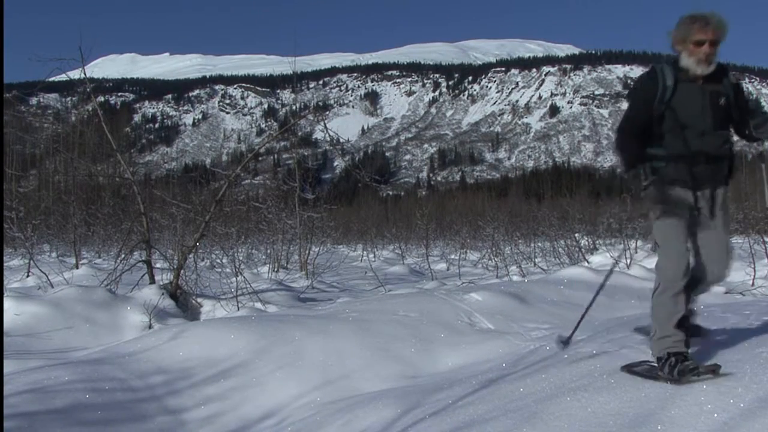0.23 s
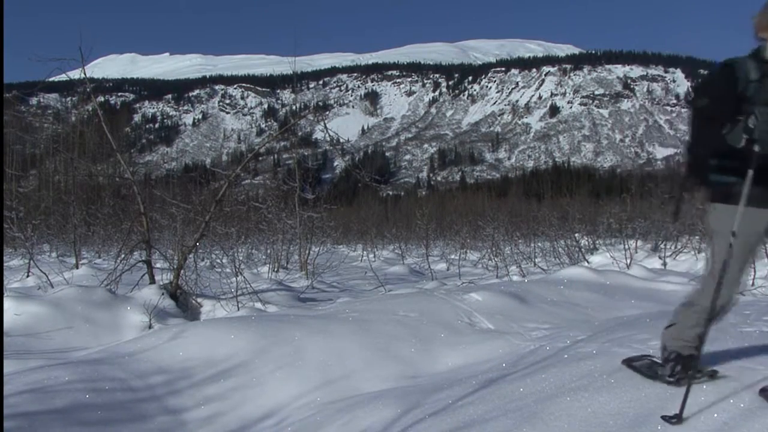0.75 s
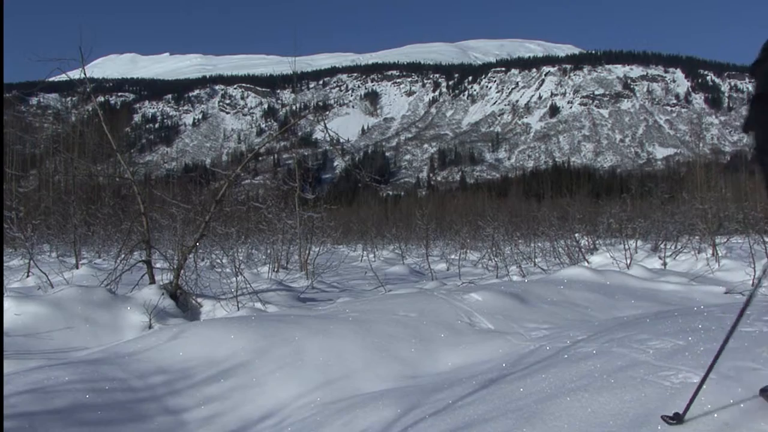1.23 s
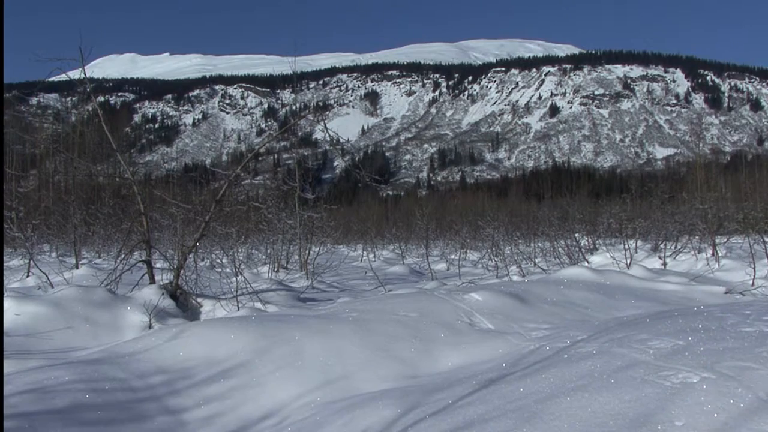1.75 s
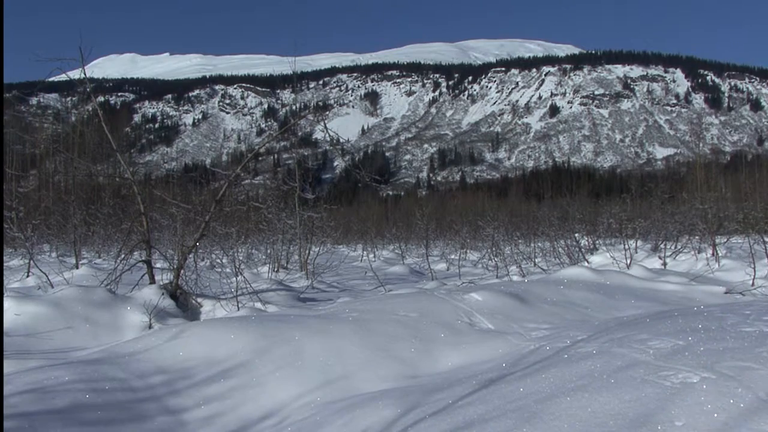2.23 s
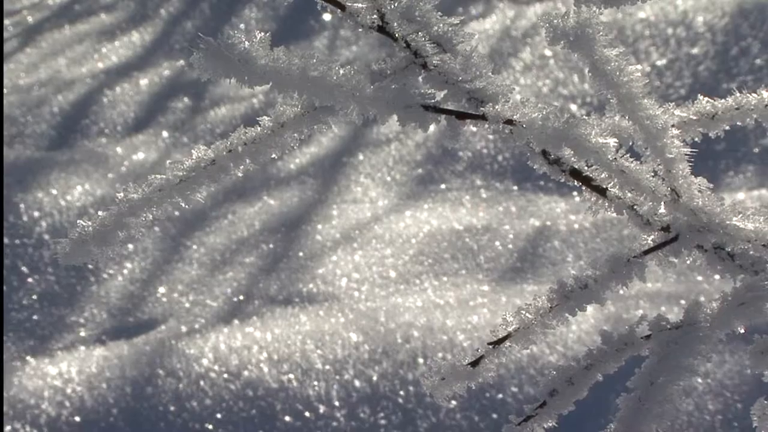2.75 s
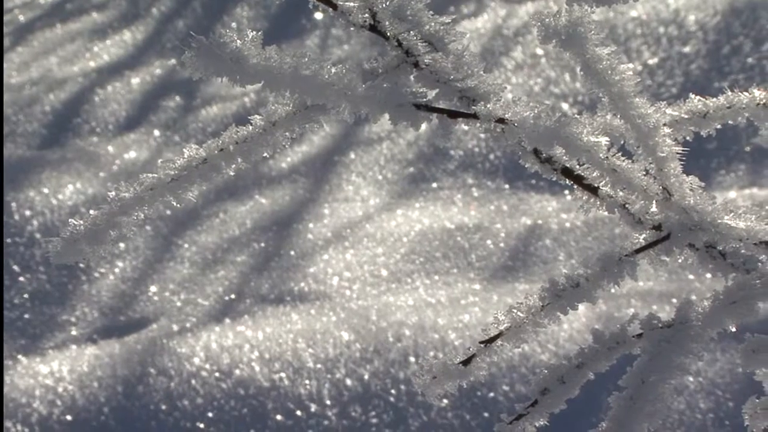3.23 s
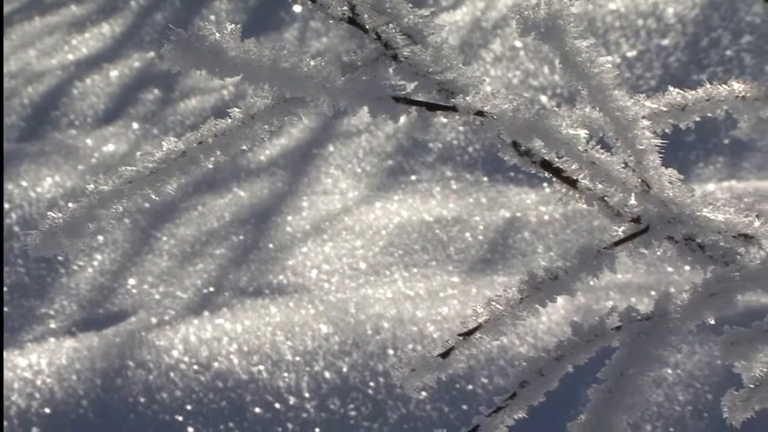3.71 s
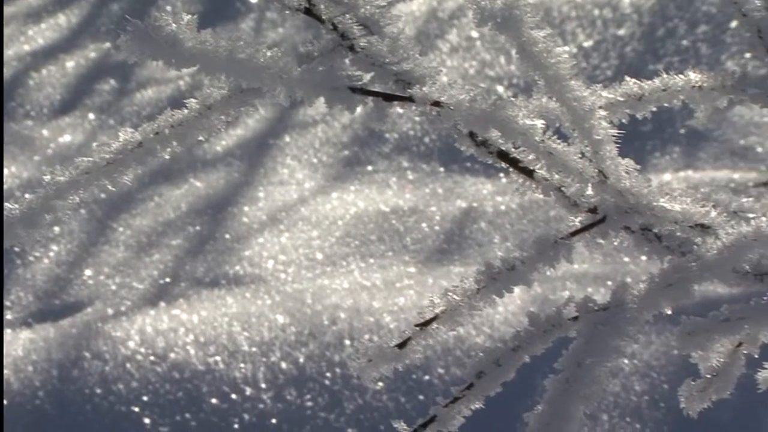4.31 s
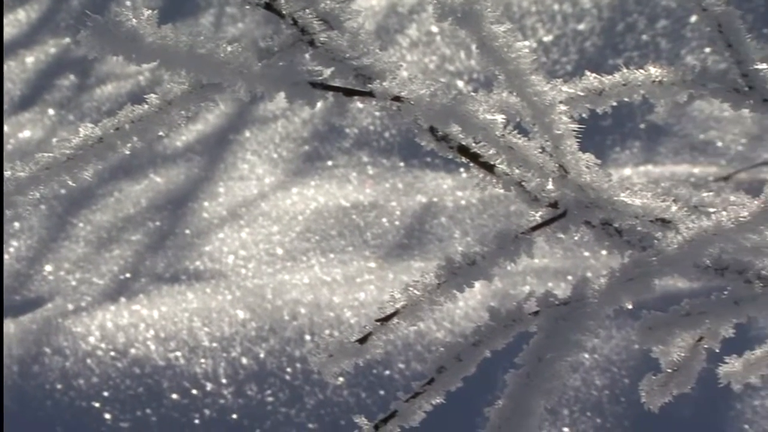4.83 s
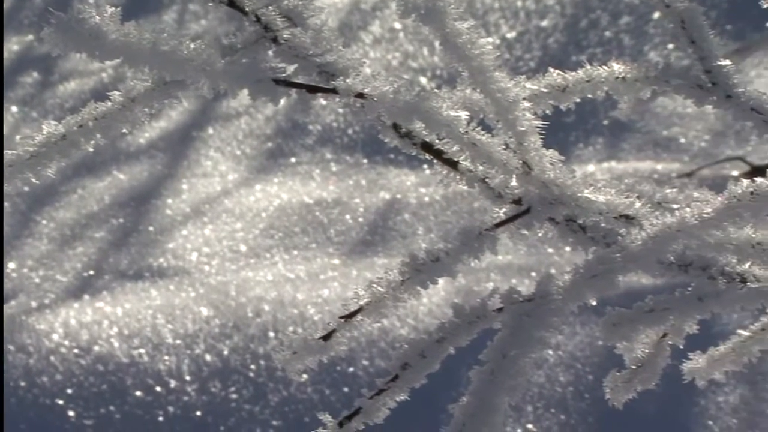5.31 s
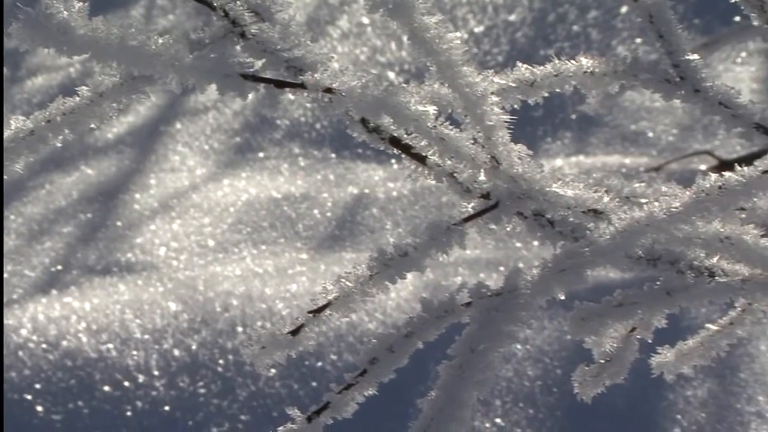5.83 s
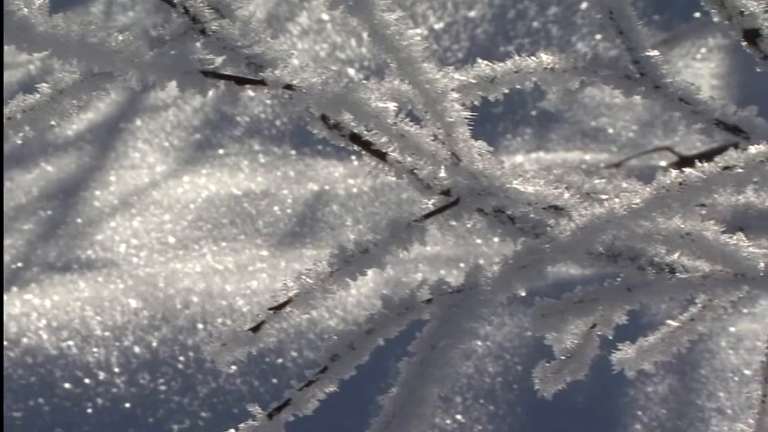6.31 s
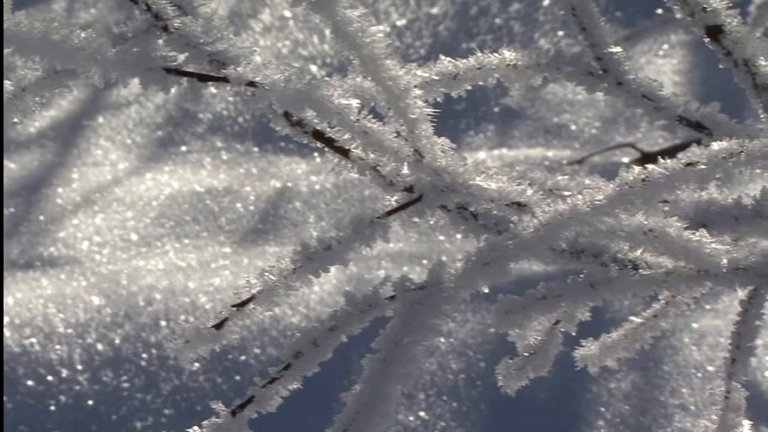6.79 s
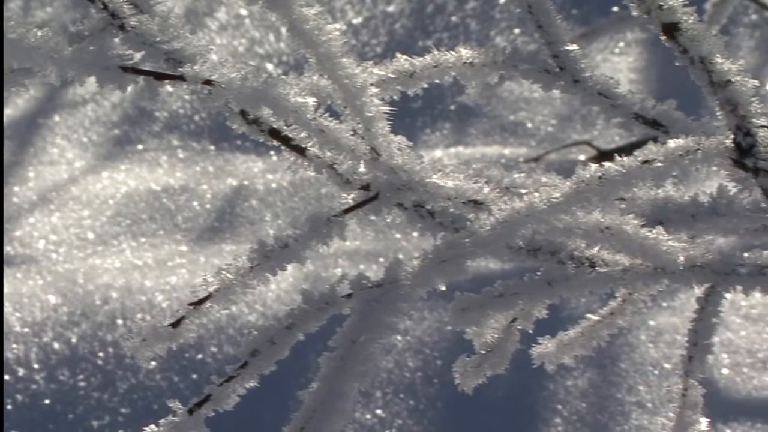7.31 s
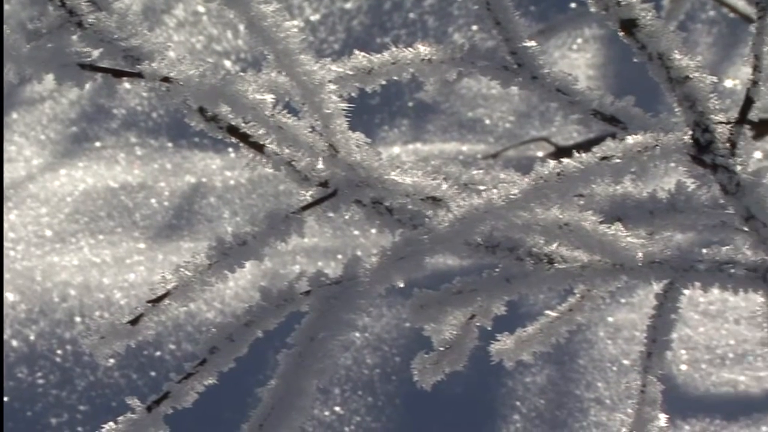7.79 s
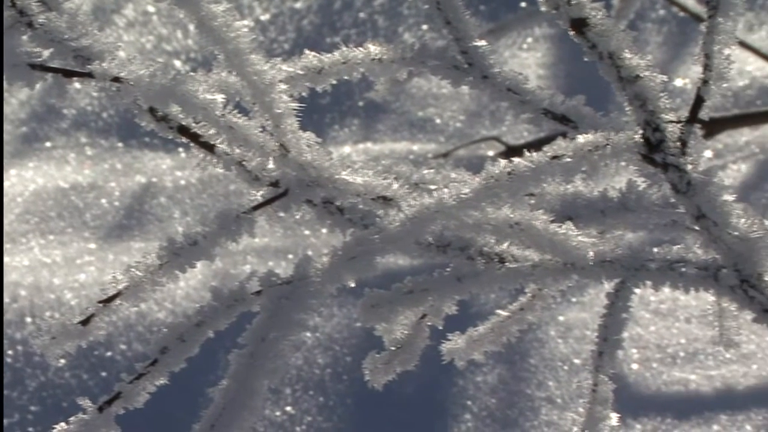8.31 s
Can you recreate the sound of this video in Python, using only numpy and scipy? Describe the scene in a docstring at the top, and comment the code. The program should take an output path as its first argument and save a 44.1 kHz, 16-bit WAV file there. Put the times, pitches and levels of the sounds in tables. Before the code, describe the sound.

Someone walks on snowshoes in open air, heard close and dry. Firm steps crush deep snow and crack its crust in short, crisp bursts, with dull thumps and an occasional light slap of the shoe against the heel. Softer steps follow, with faint squeaks of packed snow. After a short pause the crunching resumes, ending in two fuller, duller steps over a faint steady rumble and hiss.

```python
"""A close, dry crunch of snowshoes on crusted deep snow. Each step loads the snow, whose crystals fracture as
dense tiny grains; the crust gives way in short bursts and single snaps. A low thump swells with the footsteps
over a steady rumble and a faint hiss. Now and then the shoe deck slaps the heel and rings in its modes, and the
pole or binding gives short pitched creaks."""
import sys
import numpy as np
from scipy import signal
from scipy.fft import rfft, irfft, next_fast_len
from scipy.io import wavfile
from scipy.ndimage import map_coordinates

SR = 44100
rng = np.random.default_rng(int(sys.argv[2]) if len(sys.argv) > 2 else 0)


def int16_out(signal):
    """Quantize to a 16-bit WAV file."""
    q = np.round(np.clip(np.atleast_2d(signal).T, -1, 1) * 32767)
    wavfile.write(sys.argv[1], SR, q.astype(np.int16))


N = 377055


def amp(db):
    """Amplitude ratio of a level in decibels."""
    return 10 ** (np.asarray(db) / 20)


def unit(x):
    """Normalisation to an rms of 1."""
    return x / np.sqrt(np.mean(x ** 2) + 1e-20)


def envelope(rows):
    """Gain per sample, by linear interpolation in decibels between (time_s, level_db) rows."""
    return amp(np.interp(np.arange(N) / SR, *np.transpose(rows)))


def wobble(rate_hz):
    """Smooth random modulation: a spline through rate_hz Gaussian values a second."""
    knots = rng.standard_normal(int(N * rate_hz / SR) + 4)
    return map_coordinates(knots, [np.arange(N) * rate_hz / SR])


def coloured(x, spectrum):
    """Minimum-phase filtering: the gain follows (frequency_hz, gain_db) rows on a log frequency axis."""
    size = 2 * next_fast_len(N // 2 + 4096)
    hz, db = np.transpose(spectrum)
    gain = amp(np.interp(np.log(np.fft.rfftfreq(size, 1 / SR) + 1), np.log(hz + 1), db))
    cepstrum = irfft(np.log(gain + 1e-6), size)
    cepstrum[1:size // 2] *= 2  # folding the cepstrum makes the filter causal
    cepstrum[size // 2 + 1:] = 0
    return irfft(rfft(x, size) * np.exp(rfft(cepstrum)), size)[:N]


# Extra level of the middle-sized grains: time_s, gain_db
FLAKE_GAIN = [(0, 1.5), (1, 0), (2.3, 3.5), (3.4, 2), (4.1, 1), (5.3, 3), (6.3, -2.5), (7.2, -4),
              (7.6, 3.5), (8.3, 3)]


def grain_levels(time_s, level_db, brightness_db):
    """Spectral tilt: levels in dB of coarse, middle and fine grains; brightness is fine over coarse."""
    flakes_db = np.interp(time_s, *np.transpose(FLAKE_GAIN)) + 0.18 * brightness_db
    return level_db + np.array([[-brightness_db / 2], [flakes_db], [brightness_db / 2]])


# Footfalls; the faint rows are a shoe dragged forward: full_load_s, level_db, brightness_db, length_s
FOOTFALLS = [(0.096, -39.5, 0.5, 0.74), (0.818, -29.5, -1, 0.51), (1.222, -55.5, 15, 1),
             (1.524, -33, -2.5, 0.8), (1.84, -47.5, -3, .4), (2.14, -25, -4.5, 0.36), (2.406, -52, 4, 0.29),
             (2.623, -45.5, 2, 0.8), (2.896, -34.5, -4.5, 0.58), (3.51, -42.5, -2, 0.51),
             (4.14, -43.5, 7, 0.57), (4.805, -43.5, -8, 0.53), (5.232, -44.5, 4.5, 0.66),
             (6.102, -44, -4.5, 0.62), (6.553, -56.5, 6, 0.57), (6.875, -47, 0, 1),
             (7.565, -41.5, -5, 0.85), (7.87, -52, 6, .25), (8.28, -30, -9, .55)]


def step_power():
    """Loading and unloading: power in each grain size grows exponentially to full load, then decays."""
    load_share = 0.49  # of a step's length
    swing_db = 23 * np.array([[1.29], [1], [1]])  # coarse lumps swing wider
    t, power = np.arange(N) / SR, 1e-9
    for full_load_s, level_db, brightness_db, length_s in FOOTFALLS:
        away = np.maximum((full_load_s - t) / load_share, (t - full_load_s) / (1 - load_share)) / length_s
        power = power + amp(grain_levels(full_load_s, level_db, brightness_db) - swing_db * away) ** 2
    return power


def crystal_pops(count, decay_s):
    """Shot noise: lone crystals fail under slow pressure in fast-dying power spikes of mean 1."""
    when, size = rng.random((count, 2)).T
    pops = np.bincount((when * N).astype(int), -np.log(size + 0.03), N)
    spikes = signal.lfilter([1], [1, -np.exp(-1 / (decay_s * SR))], pops)
    return spikes / spikes.mean()


# Bursts of collapsing crust: start_s, hold_s, level_db, brightness_db
CRUST_BREAKS = [(0.019, 0.011, -41, 14), (0.034, 0.039, -38.5, 12), (0.127, 0.049, -35, -2),
                (0.191, 0.06, -41.5, -0.5), (0.283, 0.0092, -46, 6), (0.394, 0.016, -53.5, 8),
                (0.447, 0.014, -52.5, 9), (0.48, 0.019, -54, 7), (0.57, 0.019, -56, 0),
                (0.63, 0.012, -35.5, -7), (0.658, 0.042, -36, -3.5), (0.727, 0.025, -40.5, -15),
                (0.772, 0.0062, -32.5, 15.5), (0.797, 0.042, -33.5, 9), (0.873, 0.047, -32.5, 6),
                (0.942, 0.022, -35, 5.5), (0.983, 0.017, -47, 1), (1.074, 0.014, -40.5, 3),
                (1.104, 0.0064, -47, 21.5), (1.155, 0.0092, -48, 20.5), (1.198, 0.0087, -46.5, 7.5),
                (1.231, 0.0036, -41.5, 17.5), (1.288, 0.015, -35.5, -3.5), (1.354, 0.0076, -30.5, -2),
                (1.363, 0.093, -36, 3.5), (1.515, 0.033, -23.5, 0.5), (1.573, 0.007, -30.5, -11),
                (1.593, 0.015, -19, 1), (1.638, 0.029, -29.5, -2), (1.734, 0.011, -41.5, -4),
                (1.897, 0.021, -48, 8), (1.93, 0.0076, -30, -8), (1.966, 0.012, -48, 6),
                (2.018, 0.01, -30.5, -2), (2.031, 0.039, -40, -24), (2.125, 0.05, -26.5, 2.5),
                (2.239, 0.035, -44, 12), (2.333, 0.021, -55, 13), (2.384, 0.016, -44.5, 4),
                (2.418, 0.0066, -36, 0), (2.461, 0.017, -43.5, 9.5), (2.505, 0.011, -42.5, 12),
                (2.54, 0.0026, -25.5, -11), (2.615, 0.028, -34.5, -13), (2.664, 0.046, -45.5, -2),
                (2.726, 0.051, -31, -4), (2.79, 0.029, -34, 4), (2.865, 0.04, -25, -8.5),
                (2.927, 0.045, -29, 0.5), (2.999, 0.032, -30, -3), (3.069, 0.016, -46.5, -14.5),
                (3.284, 0.0079, -33.5, -10.5), (3.36, 0.0062, -39, -5), (3.368, 0.065, -33, 1.5),
                (3.606, 0.033, -36, 7), (3.719, 0.025, -46, 10), (3.773, 0.021, -45.5, 11),
                (3.826, 0.0048, -33.5, 13.5), (3.838, 0.013, -38, 3.5), (3.895, 0.018, -49, -7),
                (3.935, 0.0056, -43.5, 7), (3.979, 0.0094, -38, 8.5), (4.003, 0.021, -42.5, 3),
                (4.031, 0.055, -37.5, 8), (4.111, 0.015, -47, 27.5), (4.142, 0.016, -42.5, 20),
                (4.163, 0.027, -44, 13.5), (4.236, 0.011, -50, 24.5), (4.291, 0.009, -46, 22.5),
                (4.35, 0.0074, -46.5, -1), (4.422, 0.011, -42, 10.5), (4.479, 0.018, -48, 1),
                (4.579, 0.014, -44, 8.5), (4.623, 0.0079, -48.5, 4), (4.657, 0.011, -54, -4),
                (4.703, 0.008, -60, -20), (4.742, 0.012, -45, -2.5), (4.771, 0.066, -43.5, 6.5),
                (4.856, 0.031, -47, 2), (4.936, 0.026, -38, 2.5), (4.986, 0.03, -58, 11),
                (5.122, 0.0099, -50, 4), (5.147, 0.018, -50.5, 4.5), (5.198, 0.051, -38, 3.5),
                (5.267, 0.0094, -35.5, 5), (5.289, 0.0071, -40, -4), (5.356, 0.019, -43.5, 11),
                (5.395, 0.023, -47.5, 4), (5.477, 0.034, -63, 17), (5.53, 0.057, -62, 10),
                (5.897, 0.02, -54, 0), (5.934, 0.037, -42, -5.5), (6.024, 0.0055, -51, 6),
                (6.05, 0.041, -51.5, -13), (6.153, 0.061, -42.5, 10.5), (6.236, 0.011, -44, -3),
                (6.277, 0.009, -54, 18), (6.294, 0.024, -53.5, 8), (6.408, 0.019, -55, 2),
                (6.442, 0.0077, -54, 14), (6.466, 0.006, -53.5, 23), (6.543, 0.0046, -53, 33),
                (6.612, 0.029, -41.5, 10), (6.714, 0.039, -34, -4), (6.807, 0.013, -42, -5),
                (6.841, 0.0063, -44, -1), (6.872, 0.023, -45, 15.5), (6.966, 0.0069, -44, 8),
                (7.004, 0.021, -44.5, -6.5), (7.04, 0.043, -49, 10), (7.126, 0.019, -41.5, 15.5),
                (7.179, 0.005, -49, 9), (7.206, 0.011, -48, -4), (7.232, 0.022, -48.5, 1),
                (7.277, 0.014, -49, -7), (7.316, 0.022, -53, 0), (7.368, 0.013, -45, 2.5),
                (7.397, 0.013, -46, -4), (7.421, 0.02, -47.5, -5), (7.446, 0.013, -38, -9),
                (7.462, 0.038, -32, -12.5), (7.558, 0.04, -31, -4), (7.649, 0.044, -40.5, -7.5),
                (7.744, 0.023, -42.5, -1), (7.789, 0.0068, -40, 3), (7.855, 0.048, -53, 9),
                (7.938, 0.005, -48, -1), (7.955, 0.065, -41.5, 5), (8.141, 0.047, -34, -10),
                (8.202, 0.048, -30.5, -15.5), (8.301, 0.036, -33, -16), (8.386, 0.011, -35, -10.5),
                (8.417, 0.006, -45, 10.5), (8.453, 0.02, -39.5, -0.5), (8.515, 0.011, -40, -4)]


def crust_power():
    """Brittle failure: a sudden crack, then power in each grain size swells, holds and dies away."""
    power = np.zeros((3, N))
    for start_s, hold_s, level_db, brightness_db in CRUST_BREAKS:
        rise_s, fall_s = 0.0056 + 0.26 * hold_s, 0.0058 + 0.56 * hold_s
        t = np.arange(round((hold_s + rise_s + fall_s) * SR)) / SR
        swell = np.clip(t / rise_s, 0, 1) ** 0.46
        release = np.clip(1 - (t - hold_s) / fall_s, 0, 1) ** 4
        first_crack = 0.31 * np.clip(1 - t / 0.0028, 0, 1)
        shape = swell * release + first_crack
        span = power[:, round(start_s * SR):][:, :len(t)]
        span += amp(grain_levels(start_s, level_db, brightness_db)) ** 2 * shape[:span.shape[1]]
    return power


def fracture_amplitudes():
    """Incoherent sources add in power: steps, pops and crust set the amplitude of each grain size."""
    steps = step_power()
    # light pressure frees lone pops, heavy pressure packs the snow densely
    lightness = np.clip((-28 - 10 * np.log10(steps[1])) / 18, 0.1, 1)
    pop_share = np.array([[0.3], [0.55], [0.6]]) * lightness
    popping = 1 - pop_share + pop_share * crystal_pops(count=520, decay_s=0.00091)
    return np.sqrt(steps * popping + crust_power())


def grains(count, samples, low_hz, high_hz, decay_cycles, spread_db):
    """Acoustic emission: random fractures of power-law size, each a damped sinusoid; rms 1."""
    when, size, pitch = rng.random((count, 3)).T[:, :, None]
    hz, n = low_hz + (high_hz - low_hz) * pitch, np.arange(samples)
    rings = np.sqrt(hz) * np.sin(2 * np.pi * hz * n / SR) * np.exp(-hz * n / SR / decay_cycles)
    rings *= amp(-spread_db * np.log(size + 3e-3))
    positions = (when * N).astype(int) + n
    return unit(np.bincount(positions.ravel(), rings.ravel(), N)[:N])


# Coarse grains, lumps and the shoe deck: frequency_hz, gain_db
LUMP_SPECTRUM = [(71, -48.5), (120, -10.5), (225, -3.5), (622, -1), (1060, 3), (1400, -7.5), (1820, -23.5),
                 (3080, -120)]
# Middle grains, flakes: frequency_hz, gain_db
FLAKE_SPECTRUM = [(710, -24), (1200, 3.5), (2030, 2), (2630, 2), (3280, 0), (4200, -7.5), (5460, -28.5),
                  (9240, -120)]
# Fine grains, crystals heard through the microphone's cavities: frequency_hz, gain_db
CRYSTAL_SPECTRUM = [(2240, -19), (3700, -1), (4360, 1.5), (5100, -3.5), (5900, -1), (6400, -3.5),
                    (6700, -10), (7900, -10), (8700, -20), (9560, -11.5), (10400, -17), (11400, -10),
                    (13600, -20.5), (15000, -25), (15800, -40)]
# Slow change of the crystals' treble above 7 kHz: time_s, gain_db
TREBLE_GAIN = [(0, 1), (1.7, 3.5), (2.1, 1), (3, 4), (4, 0), (5, 1), (6, -4.5), (7, -2), (7.8, 1.5)]


def crunch():
    """Common amplitude modulation: three grain sizes break in shared clumps, each over a smooth rustle."""
    clumps_db = 1.36 * wobble(60) + 1.01 * wobble(200)
    lumps = grains(count=9000, samples=460, low_hz=147, high_hz=1527, decay_cycles=2.6, spread_db=1)
    flakes = grains(count=24000, samples=160, low_hz=1253, high_hz=4355, decay_cycles=5.4, spread_db=1.56)
    crystals = grains(count=60000, samples=75, low_hz=3665, high_hz=16000, decay_cycles=4.8, spread_db=4)
    sizes = [(lumps, LUMP_SPECTRUM, -4), (flakes, FLAKE_SPECTRUM, -4), (crystals, CRYSTAL_SPECTRUM, -3)]
    layers = []
    for amplitude, (crackle, spectrum, rustle_db) in zip(fracture_amplitudes(), sizes):
        rustle = amp(rustle_db) * rng.standard_normal(N)
        stream = (crackle + rustle) * amp(clumps_db + 1.03 * wobble(150))
        layers.append(coloured(amplitude * stream, spectrum) / np.std(coloured(stream, spectrum)))
    # a zero-phase filter, so the treble adds in step with the crystals
    treble = signal.sosfiltfilt(signal.butter(4, 7000, "high", fs=SR, output="sos"), layers[2])
    return sum(layers) + (envelope(TREBLE_GAIN) - 1) * treble


# A low thump that swells with the footsteps, perhaps with some wind: time_s, level_db
LOW_THUMPS = [(0.0, -62), (0.55, -83), (0.71, -51.5), (1.12, -86), (1.64, -45.5), (1.76, -68.5),
              (2.19, -54.5), (2.33, -79.5), (3.0, -50), (3.14, -76), (3.47, -54), (3.97, -73),
              (4.19, -46.5), (4.52, -70), (4.81, -51), (5.5, -70.5), (7.9, -70.5), (8.24, -63.5)]
# Colour of the thump, peaking near 110 Hz: frequency_hz, gain_db
THUMP_SPECTRUM = [(40, -16.5), (80, -18.5), (110, 5), (140, -8), (200, -7), (300, -40.5)]


def low_thumps():
    """Amplitude-modulated narrowband noise: low thumps swell unevenly over a steady rumble."""
    thump = unit(amp(1.8 * wobble(12)) * coloured(rng.standard_normal(N), THUMP_SPECTRUM))
    rumble = unit(coloured(rng.standard_normal(N), [(20, 21), (50, -2.5), (80, -4), (160, -49)]))
    return envelope(LOW_THUMPS) * thump + amp(-52) * rumble


# Noise floor of the electronics: frequency_hz, gain_db
HISS_SPECTRUM = [(88, -60), (150, -13.5), (205, 6), (274, -11), (622, -5.5), (1590, -23), (6320, -14),
                 (7390, -20), (14600, -19.5), (15800, -30)]


def hiss():
    """Stationary random noise: the electronics add a faint, even hiss."""
    return amp(-64) * unit(coloured(rng.standard_normal(N), HISS_SPECTRUM))


# Single cracks of a crust slab: start_s, level_db, pitch_hz
SLAB_SNAPS = [(.065, -13, 6300), (.7736, -2.5, 4400), (.9044, -5, 3960), (1.065, -21, 3420),
              (1.1102, -20.5, 3300), (1.1622, -18, 3240), (1.2347, -24, 3830), (1.39, -16, 1470),
              (1.5246, -9, 680), (1.5541, -7, 5970), (1.577, -13.5, 417), (1.6008, 1.5, 2780),
              (1.934, -16.5, 473), (2.0244, -8, 1000), (2.1528, 2, 1160), (2.172, -8.5, 1110),
              (2.205, -13, 1560), (2.4224, -11.5, 3700), (2.5398, -11, 1570), (2.6213, -18, 1690),
              (2.7335, -12, 3080), (2.9023, -15, 1170), (3.289, -21.5, 480), (3.8278, -1.5, 4010),
              (3.8478, -23, 1610), (3.9793, -24, 4300), (4.1449, -14, 2880), (4.1817, -23, 2520),
              (4.2388, -19, 2670), (4.2934, -19, 2480), (4.479, -29, 3540), (4.5037, -25, 4370),
              (4.5844, -25, 2820), (4.7371, -17, 1520), (5.9003, -35.5, 1520), (6.4414, -27, 5700),
              (6.467, -30, 5000), (6.5462, -24, 6000), (6.8444, -20, 4450), (6.9707, -16.5, 4170),
              (6.983, -26, 4500), (7.092, -33, 4500), (7.562, -9.5, 1910), (7.5918, -5, 1620),
              (7.6034, -6.5, 2430), (7.826, -28, 2400), (7.838, -28, 1600), (7.8683, -29, 2480),
              (7.917, -30, 1460), (7.926, -30, 2400), (7.9632, -13, 4260), (7.986, -17.5, 2540),
              (8.0092, -13.5, 4000), (8.1445, -17, 2500), (8.3352, -12, 1560)]


def snaps():
    """Damped free vibration: a cracked slab rings for a few cycles, with a noisy spray of splinters."""
    rings, spray = np.zeros((2, N + SR))
    t = np.arange(SR // 40) / SR
    spray_t60_s = 0.0043
    for start_s, level_db, pitch_hz in SLAB_SNAPS:
        start, cycles = round(start_s * SR), pitch_hz * t
        decay_cycles = 1.5 + 0.24 * pitch_hz / 1000  # small, high slabs ring for more cycles
        shape = (1 - np.exp(-4 * cycles)) * np.exp(-cycles / decay_cycles)
        rings[start:][:len(t)] += amp(level_db) * shape * np.sin(2 * np.pi * cycles)
        spray[start:][:len(t)] += amp(level_db - 7 - 60 * t / spray_t60_s) * rng.standard_normal(len(t))
    rings = coloured(rings[:N], [(80, -26.5), (350, -0.5)])
    spray = coloured(spray[:N], [(300, -32), (1500, -18), (6300, 5), (7000, -5.5), (15800, -24)])
    return rings + spray


# The shoe deck strikes the heel: start_s, level_db
HEEL_SLAPS = [(1.932, -30), (2.537, -21), (3.286, -27)]
# Resonances of the deck: pitch_hz, level_db, t60_s
DECK_MODES = [(227, -4, 0.088), (440, -4.5, 0.07), (990, -7, 0.023), (1457, 2, 0.02), (1980, 2.5, 0.018)]


def deck_slaps():
    """Modal superposition: each impact excites the deck's decaying modes at slightly new strengths."""
    out, t = np.zeros(N + SR), np.arange(SR // 8) / SR
    for start_s, level_db in HEEL_SLAPS:
        for pitch_hz, mode_db, t60_s in DECK_MODES:
            decay = amp(level_db + mode_db + 1.5 * rng.standard_normal() - 60 * t / t60_s)
            out[round(start_s * SR):][:len(t)] += decay * np.sin(2 * np.pi * pitch_hz * t)
    return out[:N]


# Creaks of the pole or binding: start_s, level_db, pitch_hz, length_s
GEAR_CREAKS = [(4.419, -41, 653, 0.026), (4.49, -45, 695, 0.025), (4.628, -35.5, 1233, 0.0081),
               (4.662, -46, 1265, 0.0074), (4.7, -46, 1260, 0.0095), (4.708, -37, 1227, 0.0083),
               (4.73, -40, 1272, 0.025), (4.778, -33, 1054, 0.012), (4.864, -34, 1020, .014),
               (7.013, -40, 577, 0.012), (7.21, -48, 810, 0.013)]


def creaks():
    """Random phase modulation: each creak swells and fades on one wavering pitch."""
    out = np.zeros(N + SR)
    for start_s, level_db, pitch_hz, length_s in GEAR_CREAKS:
        t = np.arange(round(length_s * SR)) / SR
        phase_drift = np.cumsum(0.033 * rng.standard_normal(len(t)))
        swell = amp(level_db) * np.sqrt(np.sin(np.pi * t / length_s))
        out[round(start_s * SR):][:len(t)] += swell * np.sin(2 * np.pi * pitch_hz * t + phase_drift)
    return out[:N]


def scene():
    """Superposition in a free field: snow absorbs the echoes, so only direct sound adds up."""
    return (crunch() + snaps() + creaks() + deck_slaps() + low_thumps() + hiss())[None]


def record(dry):
    """Band limiting and saturation: the microphone cuts deep bass, the input rounds off high peaks."""
    bass_cut_hz, ceiling, top_hz = 80, 0.85, 15900
    thinned = signal.sosfilt(signal.butter(3, bass_cut_hz, "high", fs=SR, output="sos"), dry)
    rounded = thinned / (1 + np.abs(thinned / ceiling) ** 4) ** 0.25
    size = next_fast_len(N + 4096)
    passband = np.fft.rfftfreq(size, 1 / SR) < top_hz
    return irfft(rfft(rounded, size) * passband, size)[:, :N]


dry = scene()
out = record(dry)
int16_out(out)
```